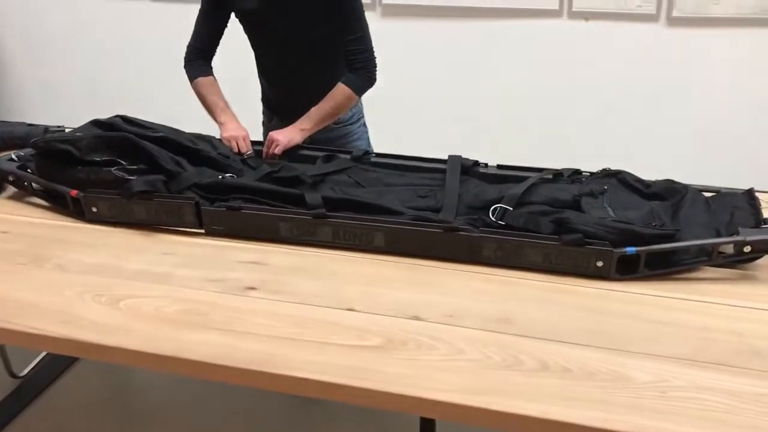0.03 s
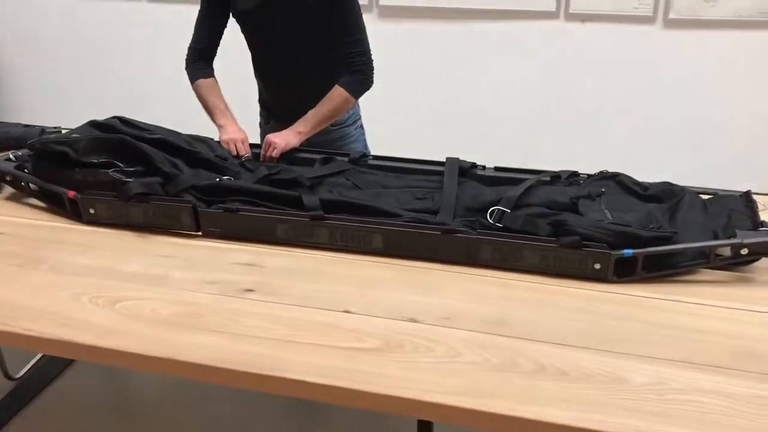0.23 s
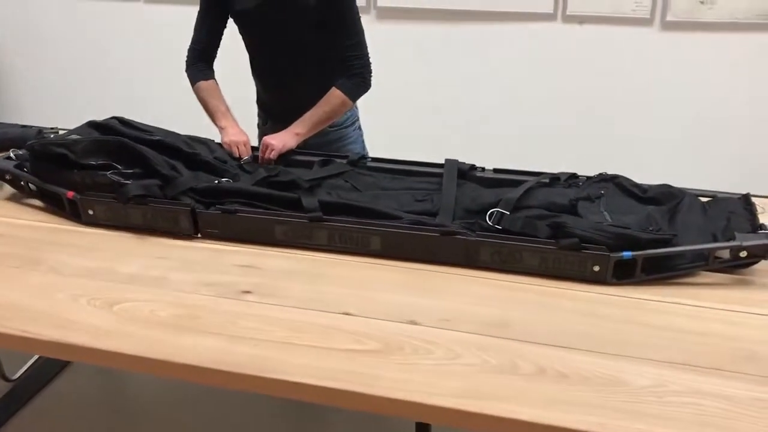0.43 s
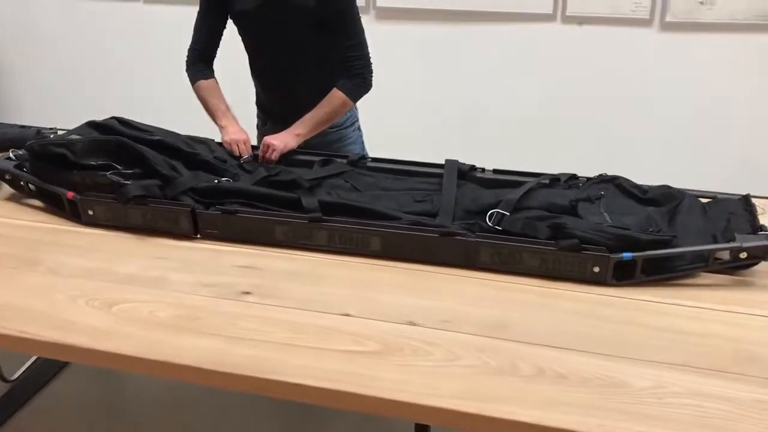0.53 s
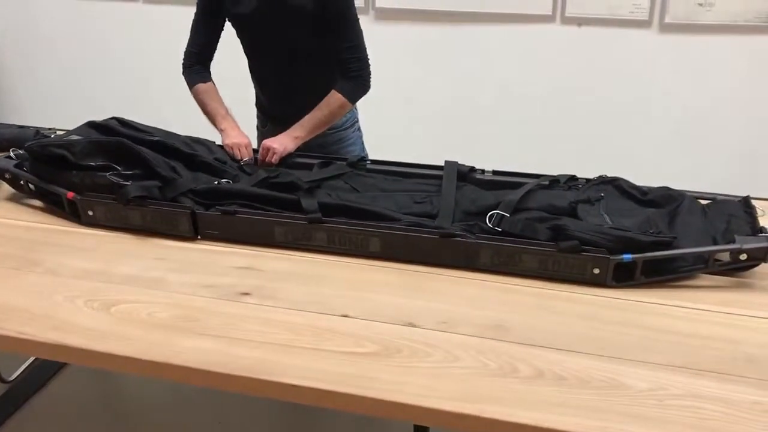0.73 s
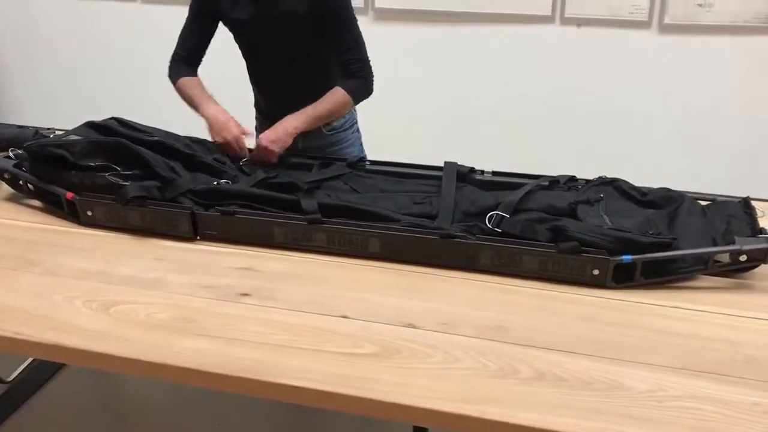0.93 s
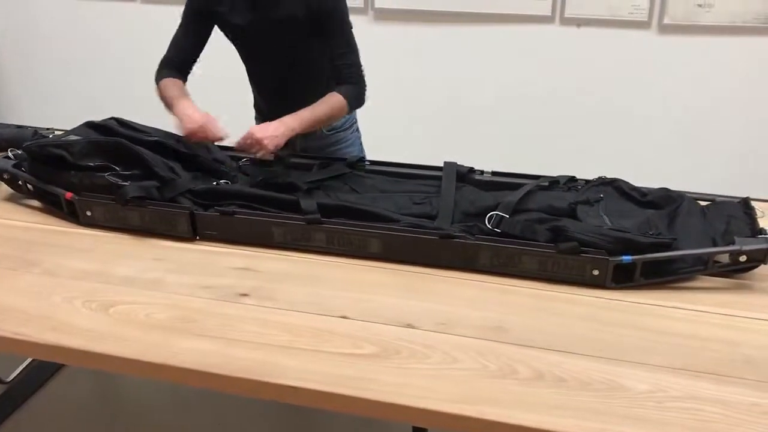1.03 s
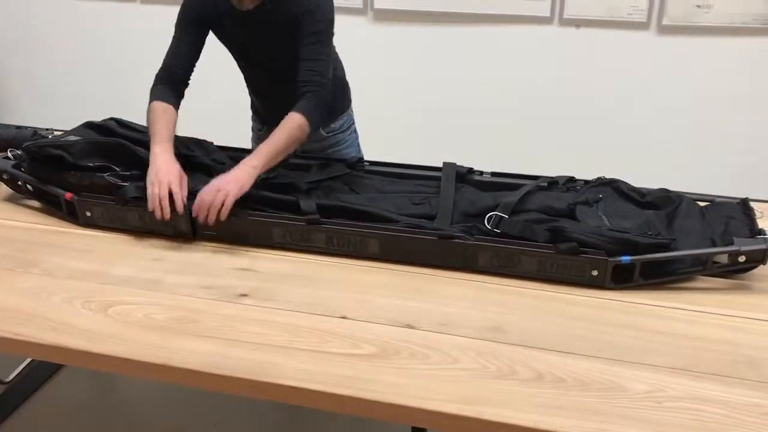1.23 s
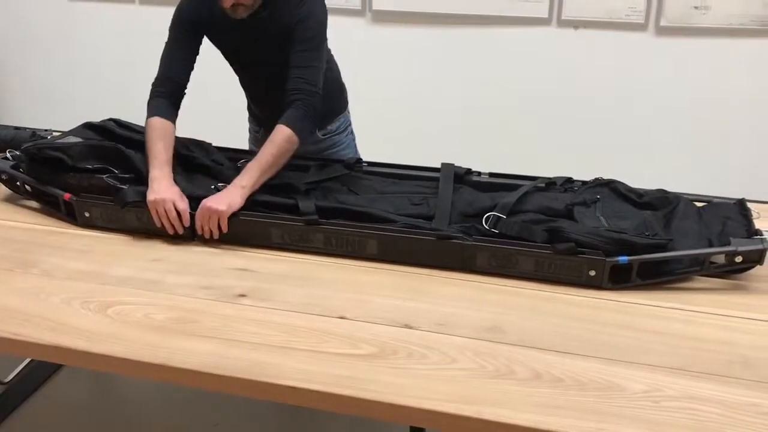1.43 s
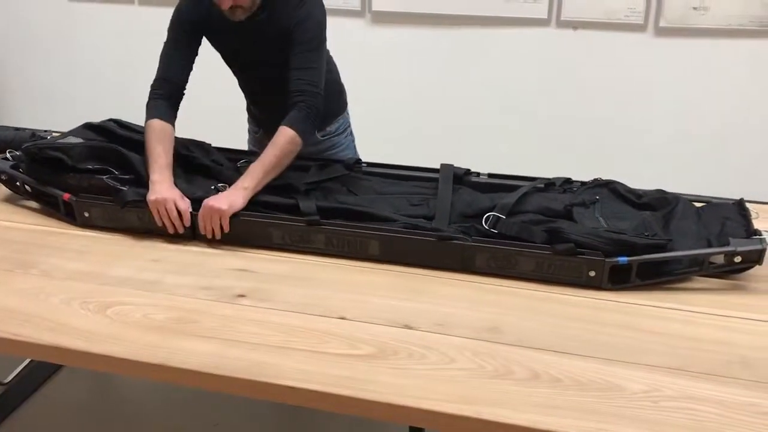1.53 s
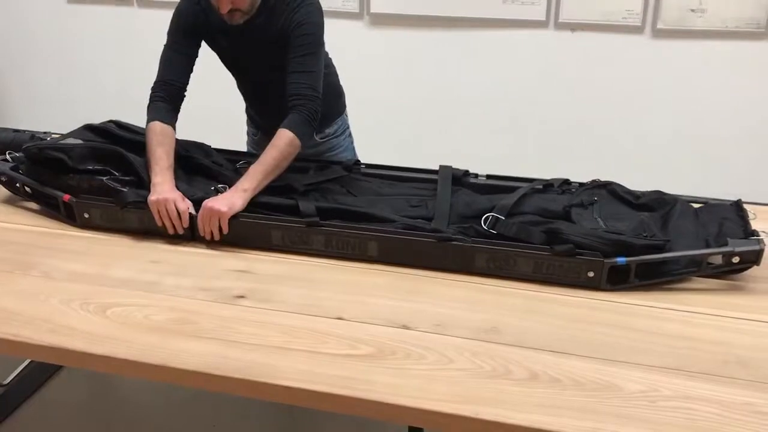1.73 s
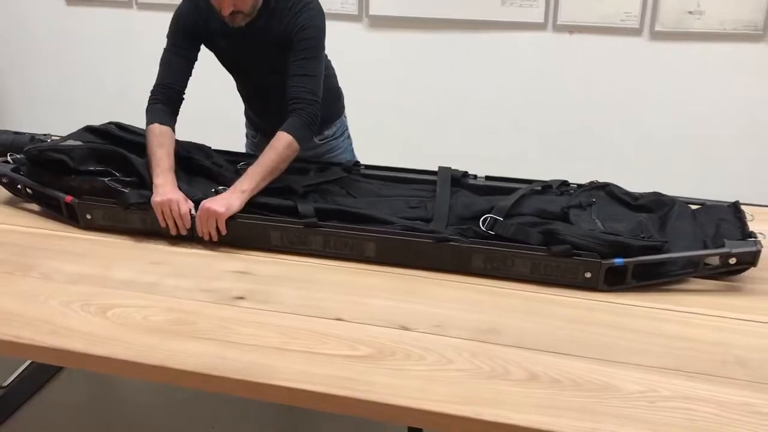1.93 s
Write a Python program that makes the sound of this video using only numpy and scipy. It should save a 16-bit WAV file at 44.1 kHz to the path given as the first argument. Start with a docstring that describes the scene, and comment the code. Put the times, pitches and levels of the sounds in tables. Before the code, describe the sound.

A folded stretcher is handled in a bare, echoing room: a quick run of metal clacks and dull thuds on a wooden table, a short lull with faint fabric rustle, then a plastic catch clicking into place.

```python
"""Light metal clacks and a rustle of cloth, then knocks: a folded stretcher is handled on a wooden table.
Each impact excites damped resonances: the frame thuds, the fittings clack and set the tubes ringing,
and loose parts chatter after each knock. Near the end a plastic catch slides by stick-slip friction
and snaps home. The bare room reverberates and rumbles faintly."""
import sys
import numpy as np
from scipy import signal
from scipy.io import wavfile
from scipy.ndimage import uniform_filter1d

SR = 44100
rng = np.random.default_rng(int(sys.argv[2]) if len(sys.argv) > 2 else 0)


def to_wav(sig):
    """Store sig (one row per channel, or 1-D mono) as 16-bit WAV at the path in sys.argv[1].

    Samples outside -1..1 are clipped; the rate is SR.
    """
    pcm = np.clip(np.atleast_2d(sig), -1, 1) * 32767
    pcm = np.round(pcm).astype(np.int16)
    wavfile.write(sys.argv[1], SR, pcm.T)  # frames by channels


N = 88200
TIME = np.arange(N) / SR
EDGES_HZ = 22 * 2 ** (np.arange(30) / 3)
CENTRES_HZ = np.sqrt(EDGES_HZ[1:] * EDGES_HZ[:-1])


def from_db(db):
    """Amplitude ratio of a level in decibels."""
    return 10 ** (np.asarray(db) / 20)


def decay(t, t60):
    """Exponential damping: 60 dB in t60 seconds."""
    return np.exp(-np.log(1000) * t / t60)


def at_bands(points):
    """Interpolation of a spectrum over log frequency, one row per band."""
    hz, value = np.transpose(points)
    return np.interp(np.log(CENTRES_HZ), np.log(hz), value)[:, None]


def noise_bands():
    """White noise filtered into third-octave bands, each of rms 1."""
    white = rng.standard_normal((2, N + SR // 2))
    filters = [signal.butter(2, edges, "band", fs=SR, output="sos") for edges in zip(EDGES_HZ, EDGES_HZ[1:])]
    bands = np.array([signal.sosfilt(sos, white[k % 2])[-N:] for k, sos in enumerate(filters)])
    return bands / bands.std(axis=1, keepdims=True)


def band_gains(spectrum, tilt_db_per_octave=0, peak_db=0):
    """Band power is spectral density times bandwidth; the gains are scaled to total power 1."""
    density_db = at_bands(spectrum) + tilt_db_per_octave * np.log2(CENTRES_HZ)[:, None] + peak_db
    gains = from_db(density_db) * np.sqrt(CENTRES_HZ)[:, None]
    return gains / np.linalg.norm(gains)


def coloured_noise(spectrum, tilt_db_per_octave=0):
    """Stationary noise with a given spectral shape."""
    return (band_gains(spectrum, tilt_db_per_octave) * noise_bands()).sum(0)


def bursts(hits, attack_s, hold_s):
    """Overlapping modes blur into damped noise at each hit (start_s, level_db, t60_s, band gains)."""
    bands, out = noise_bands(), np.zeros(N)
    bands /= np.sqrt(uniform_filter1d(bands ** 2, size=800, axis=1) + 1e-9)   # even out the level
    for start_s, level_db, t60_s, gains in hits:
        span = slice(int(start_s * SR), int(start_s * SR) + SR // 4)
        t = np.maximum(TIME[span] - start_s, 0)
        envelope = np.minimum(t / attack_s, 1) * decay(np.maximum(t - hold_s, 0), t60_s)
        out[span] += from_db(level_db) * envelope * (gains * bands[:, span]).sum(0)
    return out


def ringing(hits, modes, attack_s=0.001, spread_db=0.5):
    """Modal superposition: each hit (start_s, level_db, ...) excites one damped sinusoid per mode."""
    out = np.zeros(N)
    for start_s, level_db, *_ in hits:
        t = TIME[:N - int(start_s * SR)]
        for pitch_hz, mode_db, t60_s in modes:
            gain = from_db(level_db + mode_db - spread_db * rng.standard_normal())
            envelope = np.minimum(t / attack_s, 1) * decay(t, t60_s)
            out[N - len(t):] += gain * envelope * np.sin(2 * np.pi * pitch_hz * t)
    return out


# Spectrum of the room's background: frequency_hz, density_db
RUMBLE_SPECTRUM = [(25, -24), (45, 4.5), (75, 6.5), (120, -3.5), (180, -4.5), (290, -1.5), (600, -10.5),
                   (1300, -12), (2500, -20.5), (5000, -31.5), (10000, -47.5), (16000, -45)]

def rumble(level_db=-45):
    """Ambient noise: steady, with most of its power in the bass."""
    return from_db(level_db) * coloured_noise(RUMBLE_SPECTRUM)


# Reverberation time: frequency_hz, t60_s
ROOM_T60 = [(80, 1.4), (400, 2.22), (1200, 1.32), (4000, 1.54), (7500, 1.2), (13000, 0.43)]
# Reverberant level relative to the sound sent in: frequency_hz, level_db
ROOM_LEVELS = [(80, 2.5), (160, 0), (260, 2.5), (340, -0.5), (500, 5), (800, -1), (1200, 1), (4000, -7),
               (7000, -5), (13000, -7)]

def room(sound, build_s=0.001, early_db=-6.5, early_t60_s=0.083):
    """Reverberation by convolution: early reflections, then a tail that dies sooner in the treble."""
    build = 1 - np.exp(-TIME / build_s)
    early = build * decay(TIME, early_t60_s)
    early *= from_db(early_db) / np.linalg.norm(early)
    tail = build * decay(TIME, at_bands(ROOM_T60))
    tail *= from_db(at_bands(ROOM_LEVELS)) / np.linalg.norm(tail, axis=1, keepdims=True)
    band_share = np.sqrt(2 * np.diff(EDGES_HZ) / SR)[:, None]
    impulse_response = (band_share * np.hypot(tail, early) * noise_bands()).sum(0)
    return signal.fftconvolve(sound, impulse_response)[:N]


# Envelope of the rustle: time_s, level_db
RUSTLE_LEVELS = [(0, -58), (.1, -57), (.19, -43.5), (.32, -69), (.5, -57), (1.0, -59), (1.38, -71),
                 (1.47, -54), (1.58, -50.5), (1.76, -46), (1.86, -70), (1.92, -87), (2, -51)]
# Spectrum of the rustle: frequency_hz, density_db
RUSTLE_SPECTRUM = [(200, 13), (1200, 1), (2500, -22), (5000, -9), (9000, -19.5), (15000, -18.5)]

def fabric(roughness_db=3.5):
    """Friction noise: cloth and straps rustle under the hands in small uneven grains."""
    grain = uniform_filter1d(rng.standard_normal(N), size=256)
    level_db = np.interp(TIME, *np.transpose(RUSTLE_LEVELS)) + roughness_db * grain / grain.std()
    return from_db(level_db) * coloured_noise(RUSTLE_SPECTRUM)


# Dense resonances of the metal, loose parts and fittings alike: frequency_hz, density_db
METAL_SPECTRUM = [(30, -83), (250, -48), (900, 0), (1500, -2.5), (2000, -5.5), (3000, -4.5), (4500, -7),
                  (6000, -10.5), (8000, -17), (10000, -31.5), (13000, -24.5), (16000, -36)]

def chatter(ticks_per_s=110, gain_db=-20, shake_decay_s=0.059, tick_t60_s=0.028):
    """Rattling: loose parts tick at random, as strongly as the frame still shakes from a knock."""
    shake = sum(from_db(level_db) * (TIME > start_s) * np.exp(-np.abs(TIME - start_s) / shake_decay_s)
                for start_s, level_db, *_ in KNOCKS)
    impulses = (rng.random(N) < ticks_per_s / SR) * rng.standard_normal(N) * shake
    tick = coloured_noise(METAL_SPECTRUM) * decay(TIME, tick_t60_s)
    return from_db(gain_db) * signal.fftconvolve(impulses, tick)[:N]


# Plastic parts slipping and snapping: start_s, level_db, t60_s
SNAPS = [(.160, -42, 0.042), (0.249, -44, 0.16), (0.356, -38.5, 0.089), (0.525, -37, 0.57),
         (0.587, -28, 0.1), (.778, -27, 0.19), (1.618, -38.5, 0.06), (1.668, -36, 0.062),
         (1.6923, -19, 0.021)]
# Dense resonances of the plastic, the catch included: frequency_hz, density_db
PLASTIC_SPECTRUM = [(30, -72), (300, -14), (700, -20), (950, -4.5), (1200, -0.5), (1500, 1.5),
                    (2000, -19.5), (2600, -16), (5000, -26), (14000, -38)]
# Distinct modes of the plastic: pitch_hz, level_db, t60_s
PLASTIC_MODES = [(966, -9, 0.1), (1360, -10.5, 0.18), (1488, 2, 0.057)]

def plastic():
    """Heavy damping: the plastic parts answer with short hollow snaps."""
    hits = [(*snap, band_gains(PLASTIC_SPECTRUM)) for snap in SNAPS]
    return bursts(hits, attack_s=0.003, hold_s=0.0023) + ringing(SNAPS, PLASTIC_MODES)


# Spectrum of the catch's hard edge landing: frequency_hz, density_db
CRACK_SPECTRUM = [(200, -19), (2000, -7), (3200, -5.5), (4400, 0.5), (6000, -15), (9000, -14), (13000, -23),
                  (16000, -17)]
# Modes of the catch: pitch_hz, level_db, t60_s
CATCH_MODES = [(3840, -2, 0.049), (4626, -3.5, 0.037)]

def catch(home_s=1.692, scrape_s=0.039, slips_per_s=430, slip_jitter=0.28, crack_db=-22):
    """Stick-slip friction: the catch scrapes ever harder, lands with a crack and shivers to rest."""
    since_home = TIME - home_s
    scrape = from_db(-27) * np.clip(1 + since_home / scrape_s, 0, 1)
    shiver = from_db(-34) * decay(np.abs(since_home), t60=0.81)
    body = coloured_noise(PLASTIC_SPECTRUM, tilt_db_per_octave=-0.5)
    gaps_s = np.exp(slip_jitter * rng.standard_normal(4000)) / slips_per_s
    slips_s = np.append(0, np.cumsum(gaps_s))
    since_slip = TIME - slips_s[np.searchsorted(slips_s, TIME, "right") - 1]
    grains = decay(since_slip, t60=0.014)
    grains /= np.sqrt(np.mean(grains ** 2))
    friction = np.where(since_home < 0, scrape, shiver) * grains * body
    landing = [(home_s, crack_db, 0.018, band_gains(CRACK_SPECTRUM))]   # t60 of 18 ms
    crack = bursts(landing, attack_s=0.00044, hold_s=0.0015)
    return friction + crack + ringing(landing, CATCH_MODES)


# Metal-on-metal impacts, with ping and tube ring relative to the clack:
# start_s, level_db, t60_s, tilt_db_per_octave, pitch_hz, ping_db, ring_db
CLACKS = [(0.051, -47.5, 0.31, -4.5, 4660, -6, -5), (0.159, -44, 0.096, -2.5, 4400, -1, -14),
          (0.231, -33.5, 0.15, -1.5, 4140, 1, -27), (0.246, -36, 0.075, -17, 1150, 1, -31),
          (.352, -30, 0.035, 6.5, 5130, -4, -28), (0.521, -37, 0.067, -3, 1520, -12, -25),
          (0.531, -32.5, 0.094, -4.5, 4200, 1, -29), (0.575, -29.5, 0.081, -2.5, 3815, 5, -12),
          (0.584, -30, 0.12, 2.5, 1445, 12.5, 1), (.597, -38, 0.091, -10, 3815, 14, -22),
          (0.6158, -22, 0.066, 4.5, 6200, -12, 0), (0.636, -30.5, 0.22, 0, 4700, -14, 5),
          (0.666, -30, 0.044, -7.5, 3700, -2, -5.5), (0.7261, -26, 0.096, -1, 3740, -10, -19),
          (0.7703, -31.5, 0.1, 0, 1326, -14, -5), (0.8056, -19, 0.06, 7.5, 3895, -1.5, -1.5),
          (0.83, -26, 0.12, 2.5, 4750, 4, -23), (1.6175, -30.5, 0.026, -3.5, 3566, -25, -37),
          (1.675, -36, 0.1, 2, 3200, -10, -19), (1.698, -36.5, 0.068, -1, 3887, -10, -22),
          (1.783, -36, 0.036, -4, 2400, -4, -19), (1.985, -44.5, 0.03, 6, 3600, -16, -12)]
# Modes of the metal tubes: pitch_hz, level_db, t60_s
TUBE_MODES = [(1636, -28, 1.5), (2709, -20, 0.8), (2715, -2, 0.04), (3214, -27, .6), (3815, -16, 0.15),
              (3893, -2, 0.06), (4748, -9.5, 0.2), (5056, -20, 0.5), (5570, -20, 0.7), (5920, -28, .6),
              (6647, -22.5, 0.9), (7364, -25, 1.0), (7570, -22, 0.4), (8424, -17, 0.25)]

def fittings(peak_db=3, peak_width_octaves=0.23, ping_t60_s=0.076):
    """Hard, brief contact excites high modes: each fitting clacks, pings and sets the tubes ringing."""
    hits, tube_strikes, pings = [], [], np.zeros(N)
    for start_s, level_db, t60_s, tilt, pitch_hz, ping_db, ring_db in CLACKS:
        octaves_away = np.log2(CENTRES_HZ / pitch_hz)[:, None]
        resonance_db = peak_db * np.exp(-0.5 * (octaves_away / peak_width_octaves) ** 2)
        hits.append((start_s, level_db, t60_s, band_gains(METAL_SPECTRUM, tilt, resonance_db)))
        tube_strikes.append((start_s, level_db + ring_db))
        pings += ringing([(start_s, level_db)], [(pitch_hz, ping_db, ping_t60_s)])
    clack = bursts(hits, attack_s=0.00044, hold_s=0.0015)
    return clack, pings + ringing(tube_strikes, TUBE_MODES)


# Impacts of the frame on the table: start_s, level_db, t60_s, tilt_db_per_octave
KNOCKS = [(0.14, -35, 0.16, 2.5), (0.223, -27.5, 0.11, -4), (.239, -27, 0.1, -6.5),
          (0.288, -36.5, 0.071, 3.5), (.340, -26.5, 0.11, -4.5), (.376, -31, 0.012, -6),
          (.574, -12.5, 0.061, 3.5), (.609, -23.5, 0.077, -0.5), (.666, -29, 0.1, -5.5),
          (0.7724, -15.5, 0.039, 3.5), (.811, -21, 0.068, 2), (1.695, -33.5, 0.53, -5),
          (1.785, -38, 0.07, 3), (1.986, -37, 0.11, 1)]
# Dense resonances of the frame: frequency_hz, density_db
FRAME_SPECTRUM = [(25, -46), (48, -22), (76, -1.5), (120, -2.5), (175, -4), (245, 5), (330, -0.5),
                  (520, -5), (800, -17), (1500, -19.5), (3000, -48), (7000, -58), (14000, -85)]
# Distinct modes of the frame: pitch_hz, level_db, t60_s
FRAME_MODES = [(82.1, -15, 1.4), (114.4, -14.5, 0.54), (135.5, -4.5, .13), (203, -32, 0.28),
               (247.4, -14.5, 0.37), (310.4, -1.5, 0.086), (326, -20.5, 0.61), (439.7, -13.5, 0.22),
               (466, -22, 1.24), (577, -24.5, 0.23), (637.7, -17, 0.14), (736, -13, 0.11)]

def frame(thud_gain_db=-2):
    """Longer contact excites mainly low modes: the frame thuds on the wooden table and rings."""
    hits = [(start_s, level_db + thud_gain_db, t60_s, band_gains(FRAME_SPECTRUM, tilt))
            for start_s, level_db, t60_s, tilt in KNOCKS]
    thud = bursts(hits, attack_s=0.0033, hold_s=0.005)
    return thud, ringing(KNOCKS, FRAME_MODES)


def scene():
    """Superposition of the stretcher's direct sound, its reverberation and the room's rumble."""
    thud, frame_ring = frame()
    clack, metal_ring = fittings()
    snaps = plastic() + catch()
    contacts = thud + clack + chatter() + fabric()
    direct = contacts + snaps + frame_ring + metal_ring
    # Ringing and plastic sound drier than the other contacts.
    echo = room(contacts + from_db(-11) * metal_ring + from_db(-12) * snaps + from_db(-5.5) * frame_ring)
    return (direct + echo + rumble())[None]


def record(dry, low_cut_hz=67.6, high_cut_hz=16000):
    """Band limiting: the microphone drops the deep bass, and the top is cut steeply."""
    high_pass = signal.butter(3, low_cut_hz, "high", fs=SR, output="sos")
    low_pass = signal.ellip(10, 0.1, 80, high_cut_hz, fs=SR, output="sos")
    return signal.sosfilt(low_pass, signal.sosfilt(high_pass, dry))


dry = scene()
out = record(dry)
to_wav(out)
```